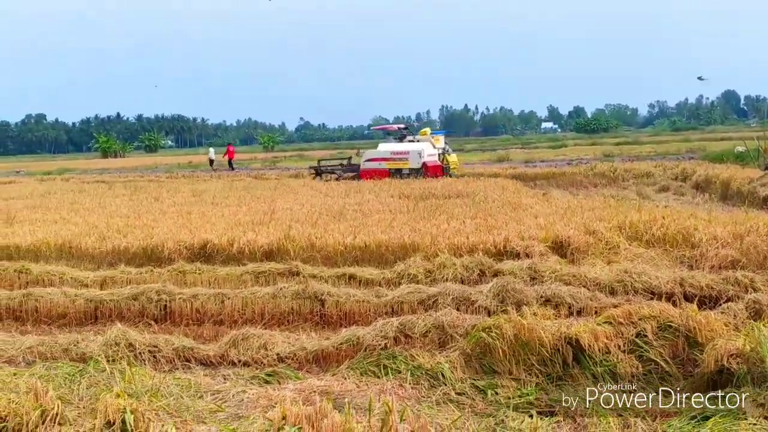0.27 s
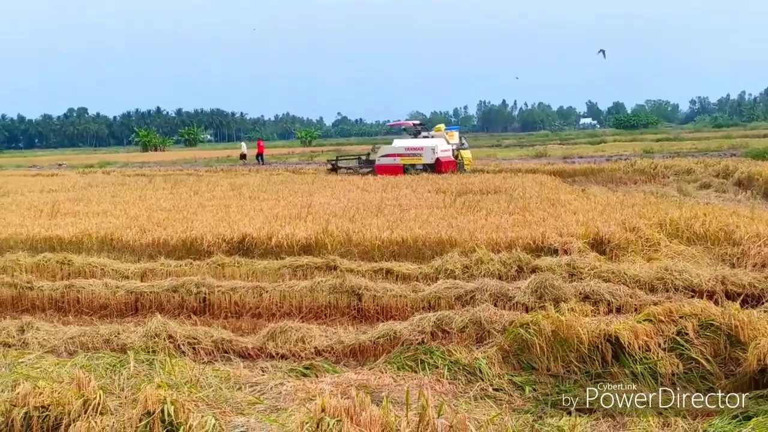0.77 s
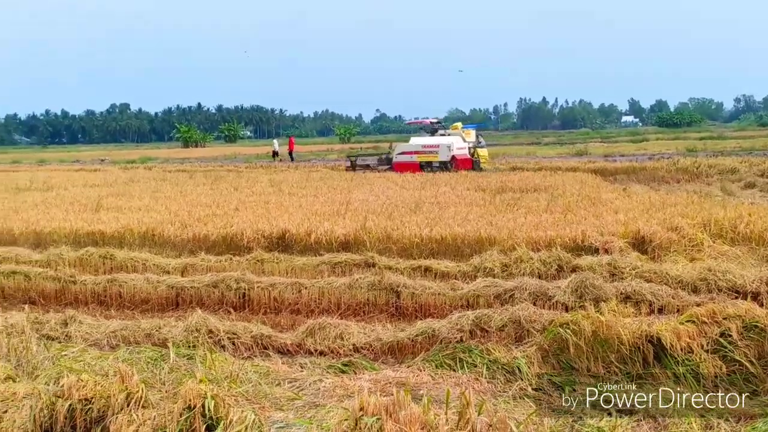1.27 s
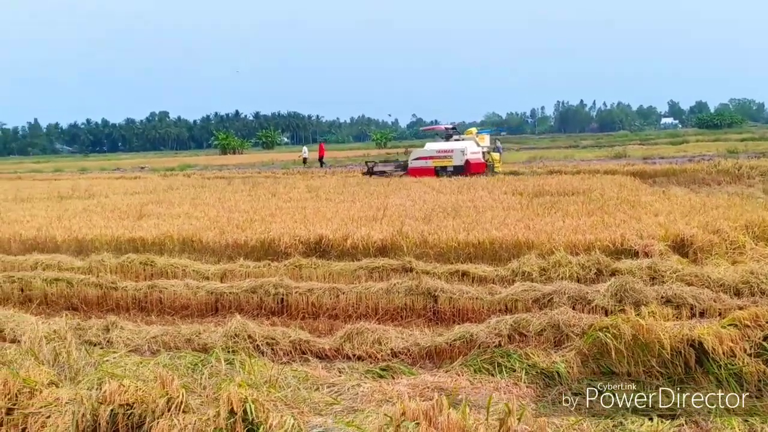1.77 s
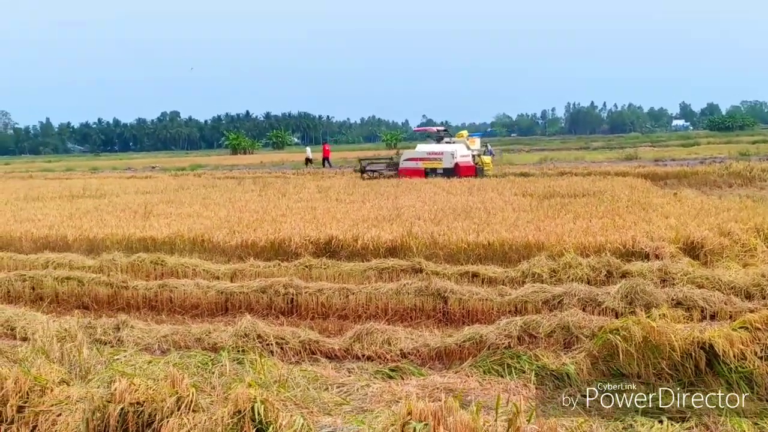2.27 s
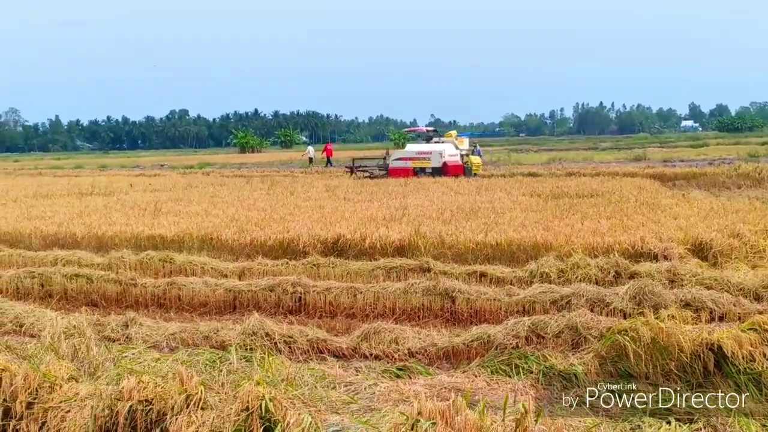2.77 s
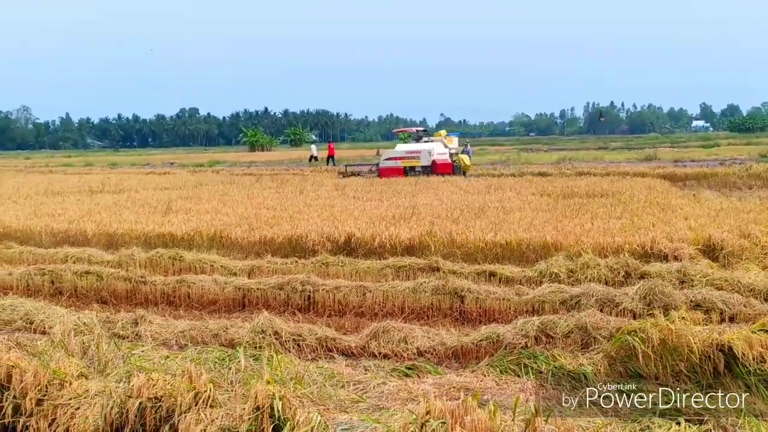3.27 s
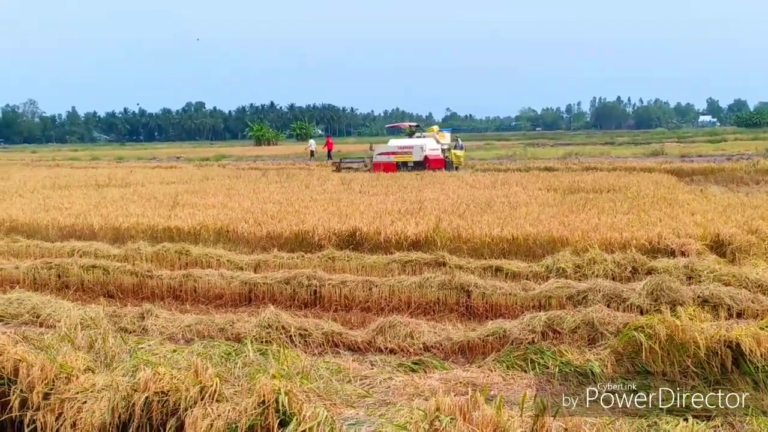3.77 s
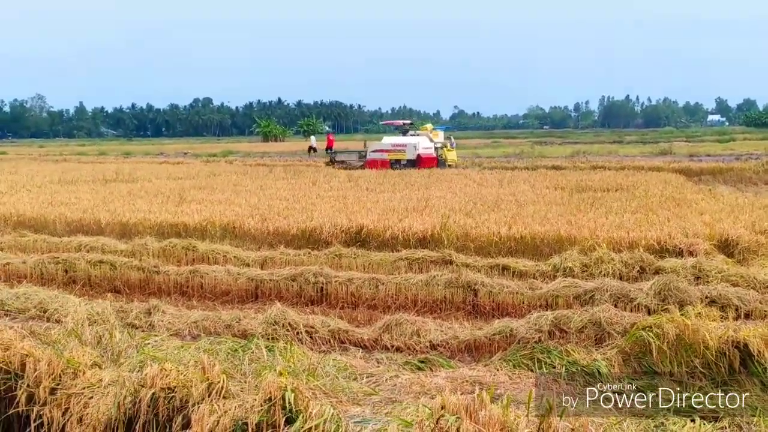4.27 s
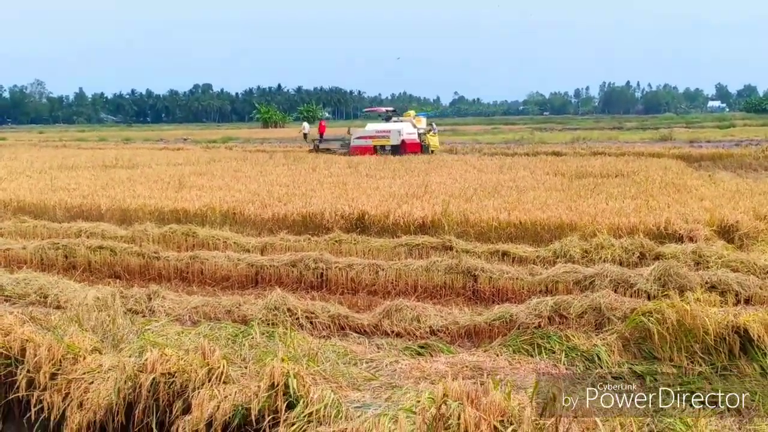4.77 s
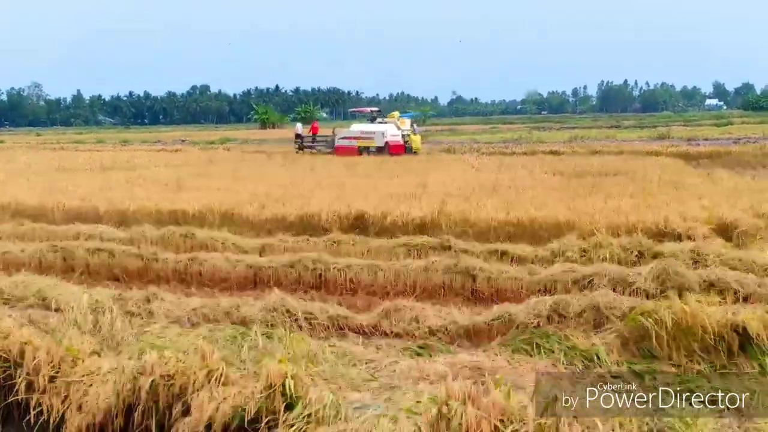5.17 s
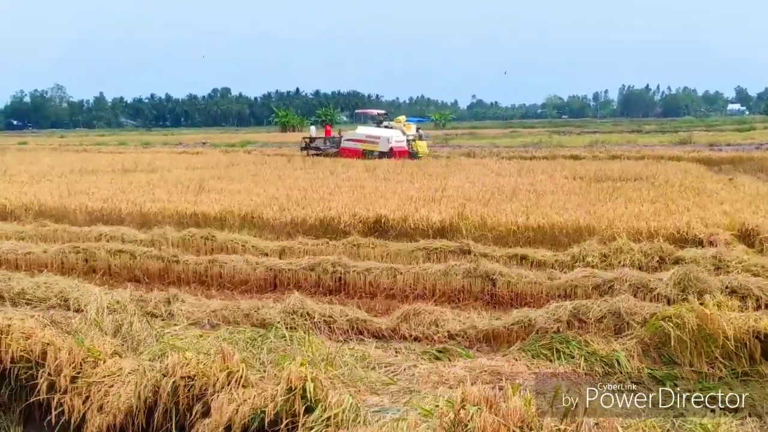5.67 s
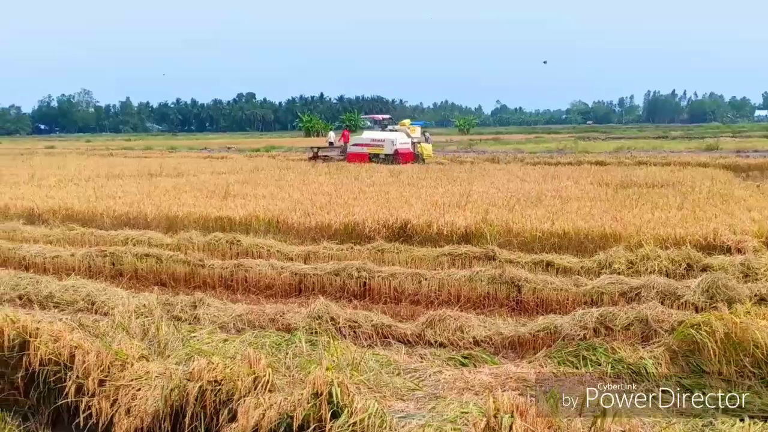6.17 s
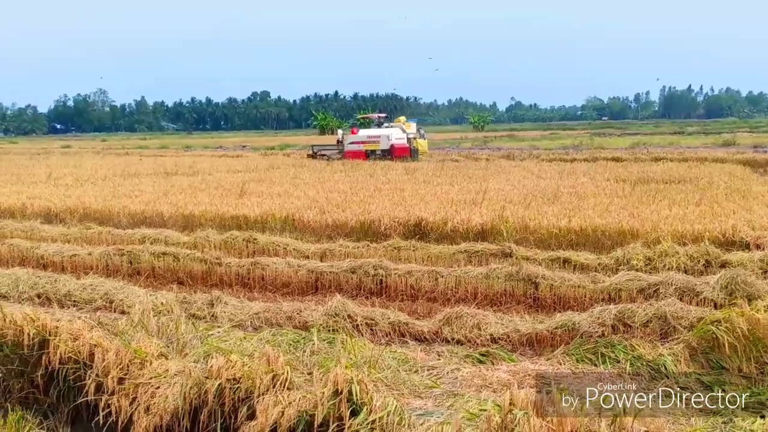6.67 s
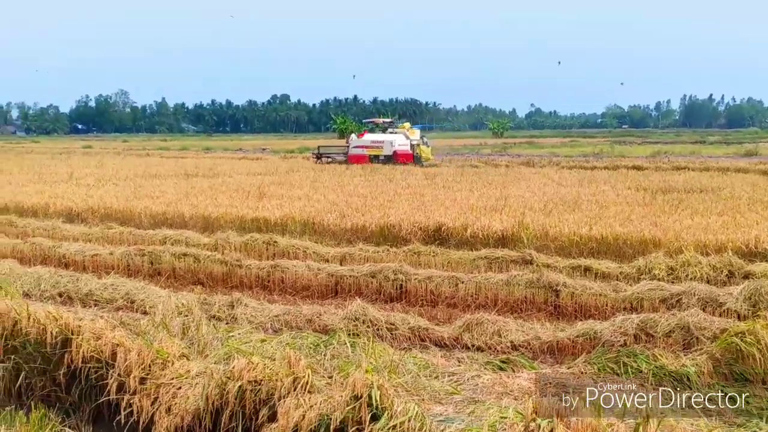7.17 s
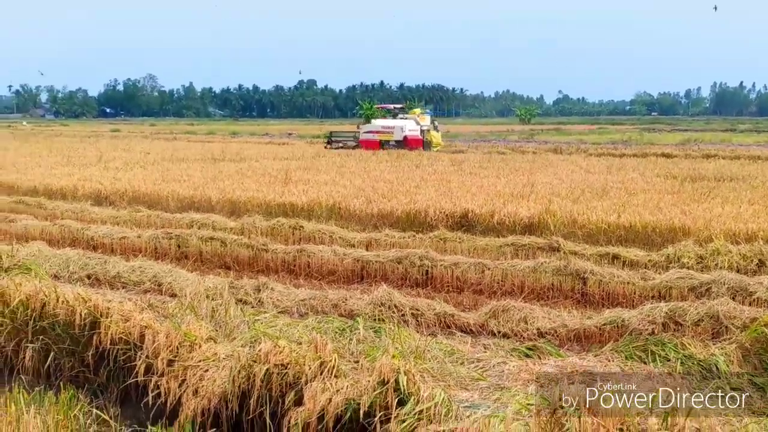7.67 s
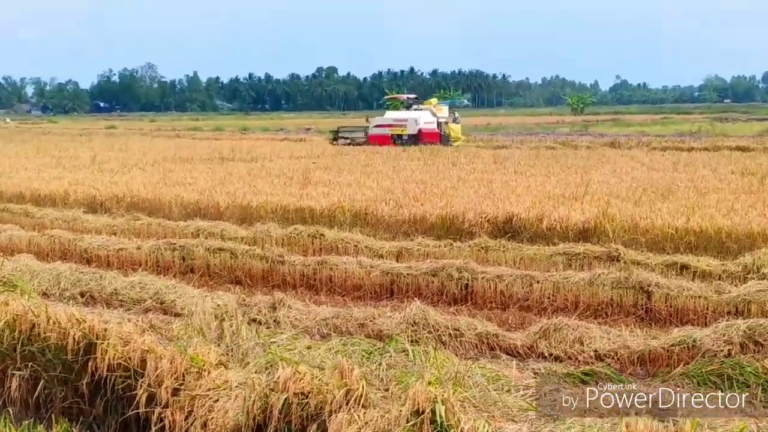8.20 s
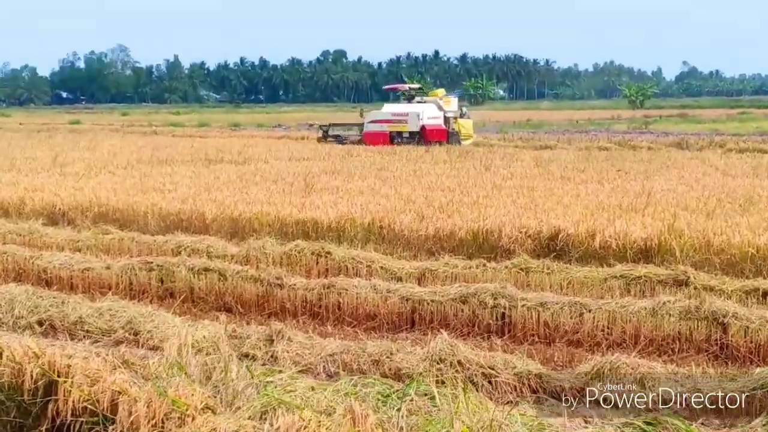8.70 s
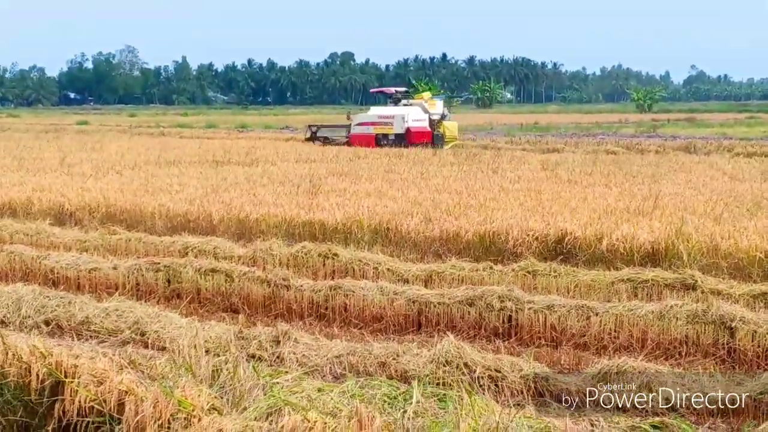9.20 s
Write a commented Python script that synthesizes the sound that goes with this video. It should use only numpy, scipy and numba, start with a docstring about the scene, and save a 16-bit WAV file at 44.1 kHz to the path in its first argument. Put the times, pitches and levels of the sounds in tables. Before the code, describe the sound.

Wind buffets the microphone in an open field, easing halfway, over the rough engine roar and whine of a far-off harvester.

```python
"""A combine harvester works a rice field far off while wind buffets the two ports of a phone.
Its engine and thresher roar throbs with the diesel firings, stirs sheet metal and arrives directly and
by short reflected paths; the fan whines, metal ticks and a low hum swells once.
Gusts rumble and pop on each port, hardest on the left, and ease as the phone turns halfway through."""
import sys
import numpy as np
from scipy import signal
from scipy.fft import rfft, irfft, next_fast_len
from scipy.io import wavfile
from scipy.ndimage import uniform_filter1d, map_coordinates
from numba import njit

SR = 44100
rng = np.random.default_rng(int(sys.argv[2]) if len(sys.argv) > 2 else 0)


def file_out(sig):
    """Save sig as 16-bit WAV at sys.argv[1]."""
    # one column per channel
    cols = np.atleast_2d(sig).T
    # limit, then scale
    lim = np.clip(cols, -1, 1)
    pcm = np.round(lim * 32767).astype(np.int16)
    wavfile.write(sys.argv[1], SR, pcm)


N = 416304

# roar band levels: (time [s], middle [dB], treble [dB], top hiss [dB])
ROAR_LEVELS = [(0, -42, -38.5, -37), (.5, -38.5, -39.5, -40), (1.0, -39.5, -41.5, -42.5),
               (1.6, -39, -39.5, -43), (2.1, -46.5, -45.5, -47.5), (2.6, -47, -46.5, -46.5),
               (2.9, -44, -43, -46.5), (3.1, -43.5, -41.5, -42.5), (3.3, -44.5, -42.5, -42),
               (3.45, -49.5, -45.5, -45.5), (3.85, -41.5, -40.5, -43), (4.3, -41.5, -44.5, -43),
               (4.8, -44, -46.5, -44), (5.2, -43.5, -46.5, -45), (5.9, -48, -48, -44.5),
               (6.2, -46.5, -51, -44.5), (6.6, -46, -48.5, -40), (7.05, -47.5, -50.5, -43),
               (7.5, -45.5, -49, -41), (7.8, -44.5, -45.5, -43), (8.4, -48.5, -49, -42),
               (9.44, -50.5, -48, -45.5)]
# scattered over direct sound: (frequency [Hz], gain [dB])
SCATTER_SPECTRUM = [(300, -42), (1000, -7.5), (2400, -8), (4000, -4.5), (6000, -1), (9000, 1), (14000, 6)]
TURN_START_S, TURN_LENGTH_S, TURNED_LAG_SAMPLES = 5.12, 0.82, 1.65


def harvester():
    """A direct wave, lagging on the left as the phone turns, plus sound scattered by crop and air."""
    now = np.arange(N)
    lag = TURNED_LAG_SAMPLES * np.clip((now / SR - TURN_START_S) / TURN_LENGTH_S, 0, 1)
    levels_db = curves(ROAR_LEVELS)
    turns = shaft_turns()
    waves = np.array([roar(turns, lag, levels_db, *spectra)
                      for spectra in ([], [SCATTER_SPECTRUM], [SCATTER_SPECTRUM])])
    waves = notches(reflections(waves, lag), lag)
    waves /= np.std(band(waves[0] + waves[2], 1963, 3300) / undb(levels_db[0]))  # sets the middle level
    direct = waves[0] + fan(turns) + hum() + ticks()
    direct_left = map_coordinates(direct, [now - lag], order=3, mode="mirror")
    return np.array([direct_left, direct]) + waves[1:]


# engine, thresher and track noise: (frequency [Hz], relative density [dB])
ROAR_SPECTRUM = [(100, 7.5), (300, 5), (420, -7.5), (600, 8), (800, 5), (1100, -1.5), (1400, -1), (2300, 2),
                 (3000, -7), (4500, -15.5), (5500, -12), (6500, -24), (8000, -31), (10000, -38),
                 (13500, -37.5), (15500, -41)]
FIRINGS_PER_TURN, CLATTER_DEPTH, BODY_DB = 0.8, 0.16, -43.5


def roar(turns, lag, levels_db, *spectra):
    """Broad machine noise that throbs with the firings; each band wavers on its own."""
    middle_db, treble_db, top_db = levels_db
    throb = 1 + CLATTER_DEPTH * np.cos(2 * np.pi * FIRINGS_PER_TURN * turns + 3.3 * walk(5.6))
    noise = sheet_metal(colour(rng.standard_normal(N), ROAR_SPECTRUM, *spectra), lag)
    below = [lowpass(noise, hz) for hz in (1450, 3300, 7500)]
    body = undb(BODY_DB + walk(8.2)) * below[0]
    middle = undb(middle_db + walk(6.5)) * (below[1] - below[0])
    treble = undb(treble_db + walk(10)) * (below[2] - below[1])
    top = undb(top_db + 1.2 * walk(30)) * (noise - below[2])
    return body + throb * (middle + treble) + top + undb(middle_db) * panel_ring(noise, lag)


# sheet-metal modes: (centre [Hz], width [Hz], gain [dB], gain per lag [dB/sample],
# shift per lag [Hz/sample])
SHEET_MODES = [(1320, 27, -12, 4.5, -1), (1654, 54, -15, 3, 1), (1768, 94, -7, 3.5, 31),
               (2169, 23, 2, -1, -36), (2353, 44, -5, 1.5, 14), (3190, 230, -16.5, 9.5, -1),
               (3786, 110, -1, 0, -1), (4420, 210, -9, 8.5, 0), (4970, 230, -8, -1, -1)]
CENTRE_DRIFT, SHEET_WAVER_DB = 0.008, 1.6


def sheet_metal(noise, lag):
    """The roar plus the drifting sheet-metal resonances it stirs."""
    for hz, width_hz, db, db_per_lag, hz_per_lag in SHEET_MODES:
        centre_hz = (hz + hz_per_lag * lag) * (1 + CENTRE_DRIFT * walk(2.5))
        gain = undb(db + db_per_lag * lag + SHEET_WAVER_DB * walk(7))
        noise = noise + gain * resonance(noise, centre_hz, float(width_hz))
    return noise


# panel surges: (time [s], half length [s], boost [dB])
PANEL_SURGES = [(.75, 0.27, 0.5), (4.202, 0.31, 3.5), (4.756, .06, 3), (6.01, 0.44, 4.5), (7.852, 0.22, 3)]
PANEL_HZ, PANEL_WIDTH_HZ = 1676, 330
RING_DB, RING_DB_PER_LAG, RATTLE_DB = -1, 0.9, 1.3


def panel_ring(noise, lag):
    """A panel rattles and rings up now and then; returns the change to its band of the roar."""
    ring = band(noise, PANEL_HZ - PANEL_WIDTH_HZ / 2, PANEL_HZ + PANEL_WIDTH_HZ / 2)
    surge_db = sum(db * bell(s, half_s) for s, half_s, db in PANEL_SURGES)
    gain = undb(RING_DB + surge_db + RING_DB_PER_LAG * lag + walk(6.7) + RATTLE_DB * walk(60))
    return (gain - 1) * ring


# reflected paths: (delay [ms], gain [ratio, negative inverts], gain per lag [1/sample])
REFLECTED_PATHS = [(.737, 0.1, -0.045), (1.471, -0.00087, -0.098)]
REFLECTION_TOP_HZ = 5800


def reflections(waves, lag):
    """Short, dull second paths comb the sound as their delays drift."""
    now = np.arange(N)
    dull = lowpass(waves, REFLECTION_TOP_HZ)
    for ms, gain, gain_per_lag in REFLECTED_PATHS:
        late = now - ms * SR / 1000 * (1 + .015 * walk(.8))
        waves = waves + (gain + gain_per_lag * lag) * np.array([np.interp(late, now, w) for w in dull])
    return waves


# spectral dips at the phone: (centre [Hz], width [Hz], depth [0-1], shift per lag [Hz/sample])
NOTCH_BANDS = [(1998, 140, 0.68, 31), (3400, 190, 0.73, 2), (5560, 290, 0.46, -2), (3990, 140, 0.26, -0.5)]


def notches(waves, lag):
    """Narrow dips that waver in centre and depth."""
    for hz, width_hz, mean_depth, hz_per_lag in NOTCH_BANDS:
        centre_hz = (hz + hz_per_lag * lag) * (1 + CENTRE_DRIFT * walk(1))
        depth = np.clip(mean_depth + .12 * walk(1.3), 0, 1)
        waves = waves - depth * np.array([resonance(w, centre_hz, float(width_hz)) for w in waves])
    return waves


# fan blade-pass tone: (time [s], pitch [Hz])
FAN_PITCH = [(0, 775), (1.0, 776), (2.1, 788), (2.8, 775), (3.2, 772), (3.45, 685), (4.5, 690), (4.7, 730),
             (5.1, 768), (5.55, 768), (5.68, 760), (5.75, 722), (5.85, 745), (6.0, 752), (6.2, 738),
             (6.35, 758), (6.62, 764), (6.84, 788), (7.4, 771), (7.55, 790), (7.72, 775), (7.79, 755),
             (7.86, 780), (8.25, 789), (9.0, 786), (9.3, 777), (9.44, 785)]
BLADES, FAN_WANDER_HZ = 6, 3


def shaft_turns():
    """Running count of fan shaft turns at a slightly wandering speed."""
    blade_hz = curves(FAN_PITCH)[0] + FAN_WANDER_HZ * walk(9)
    return np.cumsum(blade_hz) / BLADES / SR


# fan blade-pass tone: (time [s], level [dB])
FAN_LEVEL = [(0, -41), (.5, -46), (1.0, -43), (1.5, -46), (2.3, -67), (3.0, -48), (3.45, -53), (4.5, -52),
             (4.7, -44), (5.0, -43.5), (5.7, -46), (6.0, -44), (6.3, -44), (6.5, -40), (6.9, -43.5),
             (7.3, -40), (7.55, -40.5), (7.8, -39.5), (8.2, -41), (8.35, -46), (8.7, -40.5), (9.0, -44),
             (9.3, -40.5), (9.44, -45)]
# side tones: (order [per shaft turn], level re blade tone [dB])
FAN_ORDERS = [(4, -12), (5, -14.5), (7, -40)]


def fan(turns):
    """Blade tone and weaker neighbouring shaft orders, shimmering through moving air."""
    turns = turns + .012 * walk(35)
    tone = undb(1.7 * walk(25)) * np.sin(2 * np.pi * BLADES * turns)
    for order, db in FAN_ORDERS:
        tone += undb(db + 2 * walk(17)) * np.sin(2 * np.pi * order * turns)
    return undb(curves(FAN_LEVEL)[0]) * tone


HUM_HZ, HUM_DB = 160, -34.5


def hum():
    """A low tone swells once, wavering in pitch and level."""
    cycles = np.cumsum(HUM_HZ + 1.5 * walk(6.5)) / SR
    return undb(HUM_DB + walk(9.9)) * bell(s=6.12, half_s=.42) * np.sin(2 * np.pi * cycles)


# lone metal ticks: (time [s], peak [dB], centre [Hz])
METAL_TICKS = [(1.1325, -25, 2500), (1.423, -38, 3800), (3.019, -39, 3800), (5.865, -46, 5200),
               (6.6905, -30, 3100)]
TICK_MS, TICK_TOP_HZ = 6, 6000


def ticks():
    """Dry snaps of metal: broad bursts that hold a moment and stop."""
    out = np.zeros(N)
    lead, length = 100, 900  # samples
    envelope = np.exp(-(np.arange(length) / (TICK_MS * SR / 1000)) ** 2)
    for s, db, hz in METAL_TICKS:
        burst = np.pad(rng.standard_normal(length) * envelope, (lead, 0))
        snap = lowpass(band(burst, 0.55 * hz, 1.9 * hz), TICK_TOP_HZ)
        start = int(s * SR)
        out[start - lead:start + length] += undb(db) * snap / np.abs(snap).max()
    return out


# wind rumble: (frequency [Hz], relative density [dB])
RUMBLE_SPECTRUM = [(25, -42), (45, -17.5), (75, 2.5), (120, 3), (180, 0.5), (260, -4.5), (400, -20.5),
                   (800, -43), (4000, -100)]
# rumble tilt, left then right port: (frequency [Hz], gain [dB])
PORT_TILTS = [
    [(60, -1), (200, 2)],
    [(60, 1.5), (200, -2.5)],
]
FLUTTER_DB, SWARM_DB = 4, -2.5


def wind(port):
    """Turbulence on one port: fluttering rumble, a swarm of small eddies and sharp pops."""
    rumble_gain, eddy_gain = gusts(port)
    flutter = undb(FLUTTER_DB * np.minimum(walk(16), 0))
    rumble = unit(flutter * colour(rng.standard_normal(N), RUMBLE_SPECTRUM, PORT_TILTS[port]))
    swarm, crackle = eddies()
    return rumble_gain * rumble + undb(SWARM_DB) * eddy_gain * swarm + pops(port, crackle)


# steady rumble: (time [s], left level [dB], right level [dB])
STEADY_WIND = [(0, -25.5, -29.5), (.5, -26, -26), (1, -22, -28.5), (1.25, -22.5, -27), (1.55, -24, -30),
               (1.85, -23, -29), (2.1, -35, -36.5), (2.6, -26, -31.5), (3.1, -29, -32.5), (3.6, -28.5, -34),
               (3.85, -34, -32.5), (4.5, -25.5, -29.5), (5.0, -31.5, -33.5), (5.8, -32.5, -36),
               (6.6, -33, -34), (7.4, -37.5, -36), (8.3, -39.5, -38), (8.8, -37, -38), (9.44, -36, -38)]
# gusts: (time [s], half length [s], port [0 left, 1 right], rumble [dB], eddies re SWARM_DB [dB])
GUST_SWELLS = [(0.02, 0.23, 0, -39, -16.5), (0.014, 0.046, 1, -26, -39), (0.41, 0.1, 0, -22, -19.5),
               (0.5, 0.13, 1, -24, -34), (0.609, 0.092, 0, -21, -20), (0.797, 0.081, 0, -42, -21),
               (0.849, 0.1, 1, -24.5, -32), (0.998, 0.016, 0, -17.5, -37), (1.113, 0.034, 0, -21, -31),
               (1.067, 0.013, 0, -20, -41), (1.09, 0.094, 1, -29, -35), (1.233, 0.02, 0, -34, -14),
               (1.24, 0.03, 0, -25, -21), (1.54, 0.17, 0, -36, -24.5), (1.687, 0.062, 0, -27, -24),
               (1.82, 0.1, 0, -32, -19), (2.094, 0.16, 0, -37, -24.5), (2.3, 0.065, 0, -27, -32),
               (2.24, .03, 1, -25.5, -45), (1.6, 0.025, 1, -25, -43), (1.92, .04, 1, -26, -42),
               (2.04, 0.02, 0, -36, -17.5), (1.735, 0.017, 0, -30, -22), (2.165, 0.0091, 0, -34, -29),
               (2.675, 0.091, 0, -25.5, -27), (2.804, 0.072, 1, -34, -39), (2.929, 0.077, 0, -24, -25),
               (3.275, 0.13, 0, -22, -28), (3.265, 0.12, 1, -27, -55), (3.405, .012, 0, -34, -20),
               (3.424, .006, 0, -31, -20), (3.8, 0.062, 0, -22, -25), (3.71, 0.1, 0, -37, -26),
               (3.97, .09, 0, -25, -34.5), (4.06, 0.14, 1, -27, -40), (4.155, 0.16, 0, -32, -24),
               (4.382, 0.17, 0, -33, -23.5), (4.264, 0.039, 1, -27, -53), (4.676, 0.097, 0, -26, -35),
               (4.64, 0.085, 1, -31, -45), (5.166, .06, 1, -32, -51), (5.37, 0.03, 0, -31, -32),
               (5.464, 0.15, 0, -29, -53), (5.595, 0.064, 1, -24.5, -58), (5.617, 0.03, 0, -26, -38),
               (5.993, 0.054, 0, -28.5, -57), (6.163, 0.032, 1, -25.5, -49), (6.32, 0.055, 1, -28.5, -46),
               (6.682, 0.069, 1, -27.5, -41), (6.7, 0.027, 0, -26, -55), (7.187, 0.13, 1, -25.5, -37),
               (7.475, 0.053, 1, -19, -37), (7.542, 0.095, 0, -25.5, -53), (8.743, 0.049, 0, -38, -64),
               (8.735, 0.032, 1, -32, -52), (9.375, 0.03, 1, -28, -57), (9.03, 0.033, 0, -37, -48),
               (9.237, 0.084, 0, -34, -46), (9.3, .015, 0, -34, -30)]
STEADY_EDDY_DB, WIND_WAVER_DB = -17, 2


def gusts(port):
    """Gains of rumble and eddies on one port: steady wind plus a bell-shaped swell per gust."""
    rumble_gain = undb(curves(STEADY_WIND)[port] + WIND_WAVER_DB * np.minimum(walk(6), .5))
    eddy_gain = rumble_gain * undb(STEADY_EDDY_DB)
    for s, half_s, side, rumble_db, eddy_db in GUST_SWELLS:
        if side == port:
            swell = bell(s, half_s)
            rumble_gain = np.hypot(rumble_gain, undb(rumble_db) * swell)
            eddy_gain += undb(eddy_db) * swell
    return rumble_gain, eddy_gain


EDDIES_PER_S, EDDY_HZ, CRACKLE_HZ = 900, 408, 640


def eddies():
    """Random pressure flicks as a low swarm and a finer crackle, each at rms 1."""
    when, force, pitch, turn = rng.random((int(EDDIES_PER_S * N / SR), 4)).T
    at = when * (N - 1)
    force_db = np.minimum(-2.2 * np.log(force), 8) + 2.32 * walk(24.81)[at.astype(int)]
    octave = 1.65 * (pitch - .4)
    gain = undb(force_db - 7.8 * octave)  # small fast eddies carry less pressure
    return [unit(wavelets(at, hz * 2 ** octave, gain, 2 * np.pi * turn, cycles))
            for hz, cycles in ((EDDY_HZ, .46), (CRACKLE_HZ, .7))]


# sharpest eddies: (time [s], port [0 left, 1 right], base level [dB], base pitch [Hz], crack offset [dB])
WIND_POPS = [(0.062, 0, -14, 486, -16), (0.145, 0, -18, 300, -37), (0.178, 0, -14.5, 364, -19),
             (0.408, 0, -7.5, 480, -22), (0.442, 0, -4.5, 358, -36), (0.536, 0, -1, 408, -17),
             (0.584, 0, -5.5, 360, -12), (0.595, 0, -14, 440, -17), (0.637, 0, -8.5, 410, -26),
             (0.65, 0, -12, 447, -10), (0.725, 1, -14, 440, -31), (0.799, 0, -12, 370, -20),
             (0.818, 0, -13, 360, -22), (0.866, 1, -7.5, 230, -36), (0.909, 0, -8.5, 310, -38),
             (1.063, 0, -11, 230, -37), (1.14, 0, -4, 312, -13), (1.266, 0, -3, 370, -27),
             (1.273, 0, -10, 390, -25), (1.299, 0, -6, 510, -12), (1.307, 0, -0.5, 494, -28),
             (1.377, 0, -9, 298, -13), (1.413, 0, -9, 350, -21), (1.572, 0, -14.5, 310, -39),
             (1.6, 0, -13, 270, -26), (1.715, 0, -4, 416, -16), (1.731, 0, -3.5, 288, -19),
             (1.806, 0, 0, 415, -3.5), (1.815, 0, -5, 424, 2), (1.855, 0, -2.5, 477, -10),
             (1.865, 0, -5, 443, 2.5), (1.889, 0, -6.5, 480, -6), (1.913, 0, -6.5, 500, 0.5),
             (1.968, 0, -9, 513, -12), (1.976, 0, -4, 560, -7.5), (1.995, 0, -2.5, 575, -15),
             (2.064, 0, -7.5, 420, -8), (2.088, 0, -13, 504, -40), (2.099, 0, -8, 520, -14),
             (2.108, 0, -9, 560, -14), (2.132, 0, -13, 600, -4), (2.174, 0, -9, 500, -16),
             (2.187, 0, -3, 480, -23), (2.206, 0, -10, 570, 3), (2.23, 0, -2, 610, -12),
             (2.287, 0, -9, 420, -18), (2.332, 0, -9, 300, -42), (2.36, 0, -17, 200, -40),
             (2.399, 0, -11.5, 368, -43), (2.432, 0, -22, 230, -40), (2.484, 0, -13, 280, -43),
             (2.505, 0, -9, 423, -27), (2.58, 0, -8, 266, -41), (2.601, 0, -4.5, 530, -27),
             (2.619, 0, -11, 464, -19), (2.762, 0, -12, 340, -35), (2.765, 1, -8, 270, -36),
             (2.798, 0, -10, 405, -38), (2.892, 0, -2.5, 364, -17), (2.906, 0, -5, 336, -23),
             (2.928, 0, -24, 320, -20), (3.104, 0, -14, 320, -31), (3.113, 0, -12.5, 440, -36),
             (3.224, 0, -9, 414, -18), (3.254, 0, -20, 240, -36), (3.35, 1, -9, 258, -33),
             (3.373, 0, -6, 365, -3), (3.393, 0, 1.5, 503, -10), (3.434, 0, 1, 440, -7),
             (3.446, 0, -9, 340, -32), (3.478, 0, -6.5, 496, -12), (3.634, 0, -24, 296, -32),
             (3.668, 0, -18, 350, -31), (3.704, 0, -17.5, 380, -34), (3.762, 0, -18, 400, 2),
             (3.795, 0, -17, 328, -35), (3.801, 0, -10.5, 410, -11), (3.826, 0, -17, 420, -21),
             (4.184, 0, -9, 453, -36), (4.276, 0, -11, 414, -26), (4.29, 0, -7.5, 430, -22),
             (4.3, 1, -8.5, 210, -32), (4.321, 0, -18, 390, -1), (4.408, 0, -9, 430, -23),
             (4.538, 0, -6.5, 290, -42), (4.571, 0, -18, 263, -39), (4.651, 0, -14, 438, -32),
             (5.068, 0, -22, 317, -31), (5.319, 1, -12.5, 413, -36), (5.587, 1, -11.5, 220, -25),
             (5.649, 1, -17, 313, -30), (6.306, 0, -23, 230, -28), (6.703, 1, -8.5, 338, -37),
             (6.792, 1, -16, 330, -25), (7.16, 1, -18, 300, -29), (7.243, 1, -20, 368, -29),
             (7.263, 1, -8.5, 346, -34), (7.443, 1, -0.5, 375, -23), (7.457, 1, -22, 367, -36),
             (7.464, 1, -3, 412, -15), (7.501, 1, -8, 203, -30), (7.522, 1, -10, 205, -28),
             (8.566, 1, -16, 320, -31), (8.892, 1, -17, 210, -35), (8.951, 1, -13, 262, -35),
             (9.299, 0, -11, 330, -34)]
POP_LEAK, POP_LEAN_RAD, POP_SCATTER_RAD = 0.023, .6, 0.54
CRACK_HZ, THUD_DB, THUD_DELAY_CYCLES = 1100, -7.5, 0.67
FLARE_DECAY_S, FLARE_LEFT_DB, FLARE_RIGHT_DB = .0065, -6, -18


def pops(port, crackle):
    """Sharp eddies suck and push on the membrane, each with a crack, a thud and a flare of crackle."""
    s, side, db, hz, crack_db = np.transpose(WIND_POPS)
    scatter = POP_SCATTER_RAD * rng.standard_normal((len(s), 3))
    pop_phase, crack_phase, thud_phase = (np.pi + scatter + [POP_LEAN_RAD, POP_LEAN_RAD, np.pi]).T
    gain = undb(db) * np.where(side == port, 1, POP_LEAK) * (1 - 2 * port)  # inverted on the right
    out = wavelets(s * SR, 1.2 * hz, gain * undb(-2), pop_phase, cycles=0.49)
    # crack: three simultaneous snaps of unlike pitch
    snaps = rng.standard_normal((len(s), 3, 3)).transpose(1, 2, 0)
    for _, pitch, twist in snaps:
        out += wavelets(s * SR, CRACK_HZ * 2 ** (.25 * pitch), gain * undb(crack_db - 5.5),
                        crack_phase + 3 * twist, cycles=0.42)
    # thud: the membrane swings back slowly
    thud_at = (s + THUD_DELAY_CYCLES / hz) * SR
    out += wavelets(thud_at, 0.49 * hz, gain * undb(THUD_DB), thud_phase, cycles=0.51)
    flare_db = (FLARE_LEFT_DB, FLARE_RIGHT_DB)[port]
    hits = np.bincount((s * SR).astype(int), np.abs(gain) * undb(flare_db), N)
    trails = signal.lfilter([1], [1, -np.exp(-1 / (FLARE_DECAY_S * SR))], hits)
    return out + uniform_filter1d(trails, size=800) * crackle


def undb(db):
    """Gain of a dB value."""
    return 10 ** (np.asarray(db) / 20)


def unit(x):
    """Scale to rms 1."""
    return x / np.sqrt(np.mean(x ** 2))


def curves(table):
    """Each column after time, interpolated per sample."""
    s, *columns = np.transpose(table)
    return [np.interp(np.arange(N) / SR, s, c) for c in columns]


def bell(s, half_s):
    """Swell to 1 at time s and fade again."""
    return np.exp(-((np.arange(N) / SR - s) / half_s) ** 2)


def walk(rate_hz):
    """Random steps smoothed twice; rms 1."""
    hold = int(SR / rate_hz)
    steps = np.repeat(rng.standard_normal(N // hold + 1), hold)
    return unit(uniform_filter1d(uniform_filter1d(steps, hold), hold)[:N])


def colour(x, *spectra):
    """Filter by the product of (Hz, dB) spectra."""
    size = next_fast_len(N)
    log_hz = np.log(np.arange(size // 2 + 1) * SR / size + 1)
    db = sum(np.interp(log_hz, np.log(hz), level) for hz, level in map(np.transpose, spectra))
    return irfft(rfft(x, size) * undb(db), size)[:N]


def band(x, lo_hz, hi_hz):
    """Zero-phase band-pass."""
    return signal.sosfiltfilt(signal.butter(2, [lo_hz, hi_hz], "band", fs=SR, output="sos"), x)


def lowpass(x, hz):
    """Zero-phase low-pass."""
    return signal.sosfiltfilt(signal.butter(2, hz, fs=SR, output="sos"), x)


@njit
def resonance(x, hz, width_hz):
    """State-variable band-pass, gain 1 at its moving centre."""
    y, band_state, low_state = np.empty(len(x)), 0., 0.
    for i in range(len(x)):
        g, damping = np.tan(np.pi * hz[i] / SR), width_hz / hz[i]
        v = (band_state + g * (x[i] - low_state)) / (1 + g * (g + damping))
        band_state, low_state = 2 * v - band_state, low_state + 2 * g * v
        y[i] = damping * v
    return y


@njit
def wavelets(at, hz, gain, phase, cycles):
    """Pressure flicks at sample positions: cosines under bells of half length `cycles`."""
    out = np.zeros(N)
    for k in range(len(at)):
        half = cycles * SR / hz[k]
        for i in range(max(0, int(at[k] - 2.5 * half)), min(N, int(at[k] + 2.5 * half))):
            u = (i - at[k]) / half
            out[i] += gain[k] * np.exp(-u * u) * np.cos(2 * np.pi * cycles * u + phase[k])
    return out


BASS_LEAK, BASS_LEAK_HZ = 0.11, 220


def scene():
    """Harvester plus wind on each port; the slowest pressure swings reach across."""
    air = np.array([wind(port=0), wind(port=1)])
    return harvester() + air + BASS_LEAK * lowpass(air[::-1], BASS_LEAK_HZ)


LOW_CUT_HZ, HIGH_CUT_HZ = 45, 15550


def record(dry):
    """The phone drops the deep bass, rounds the loudest peaks and cuts the top."""
    thinned = signal.sosfilt(signal.butter(2, LOW_CUT_HZ, "high", fs=SR, output="sos"), dry)
    rounded = np.tanh(0.89 * thinned) / 0.91
    return signal.sosfilt(signal.ellip(12, .2, 90, HIGH_CUT_HZ, fs=SR, output="sos"), rounded)


dry = scene()
out = record(dry)
file_out(out)
```